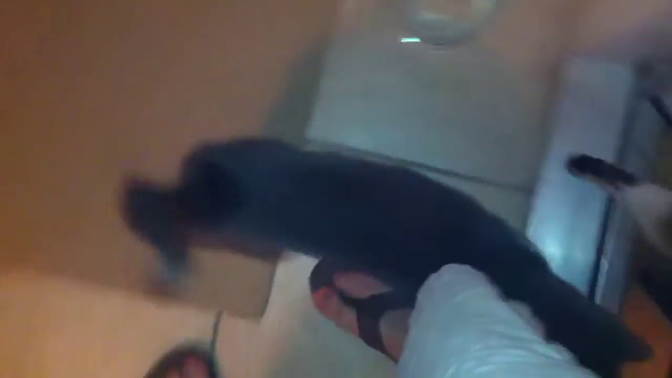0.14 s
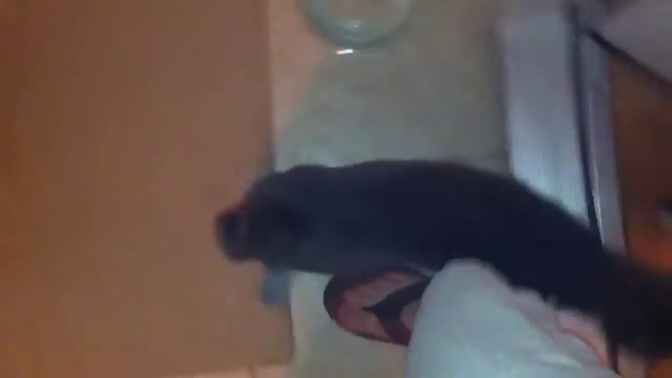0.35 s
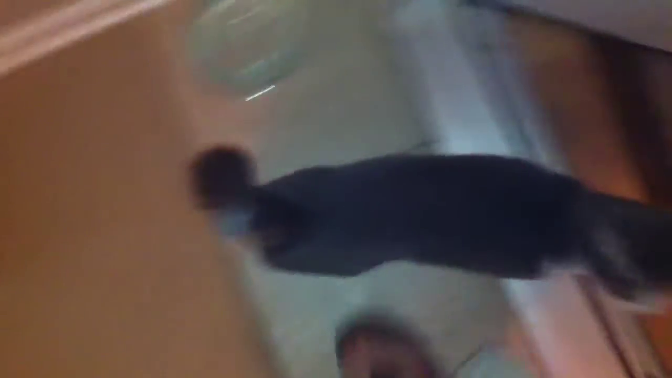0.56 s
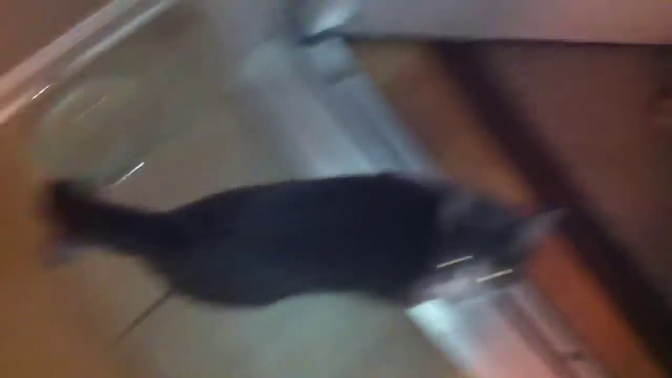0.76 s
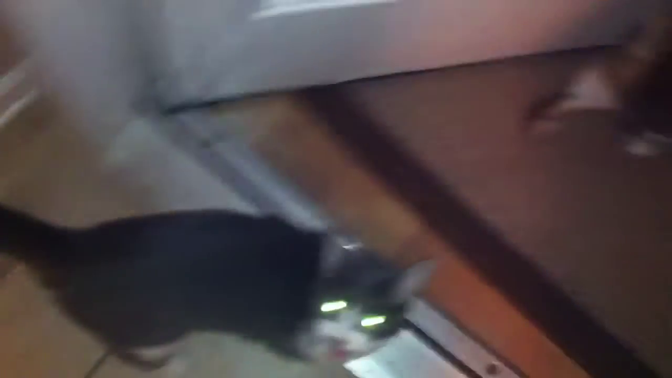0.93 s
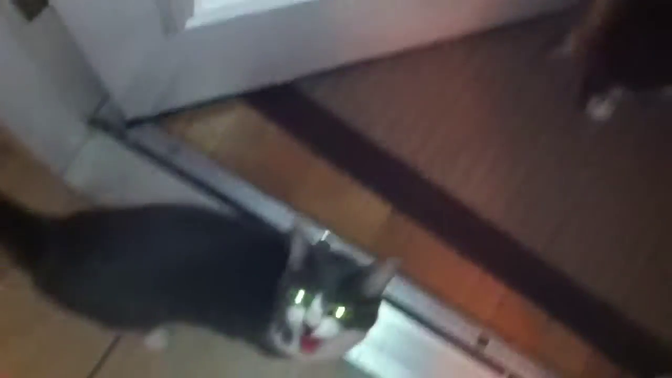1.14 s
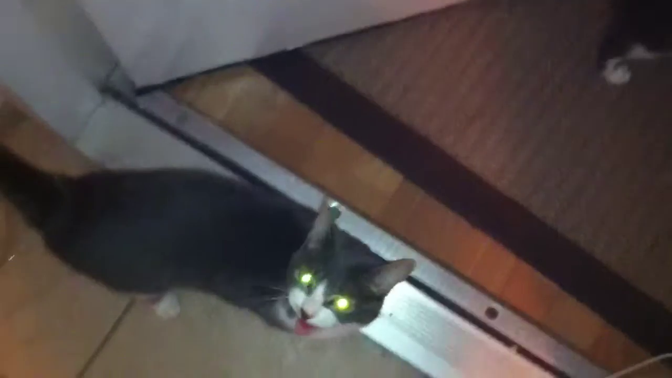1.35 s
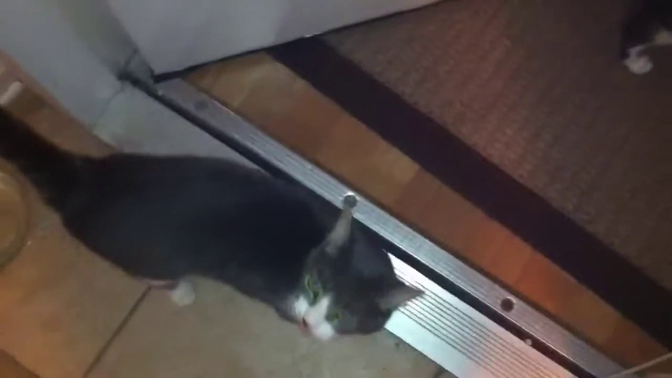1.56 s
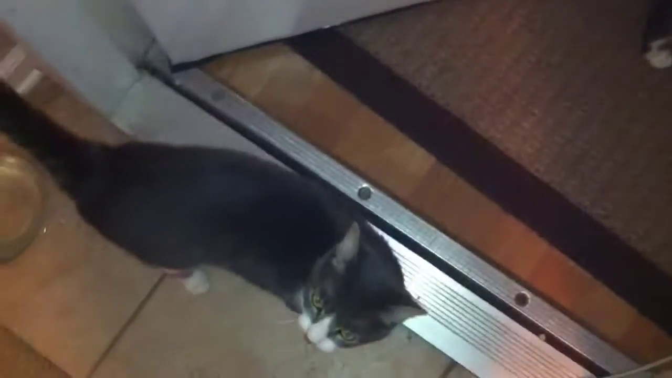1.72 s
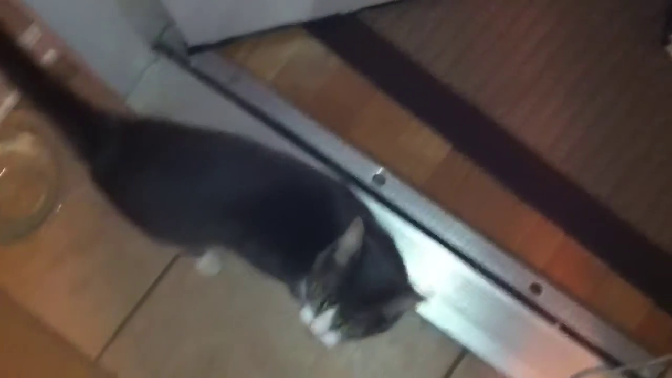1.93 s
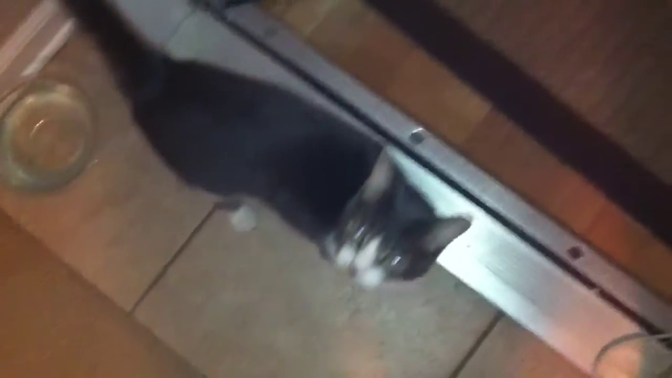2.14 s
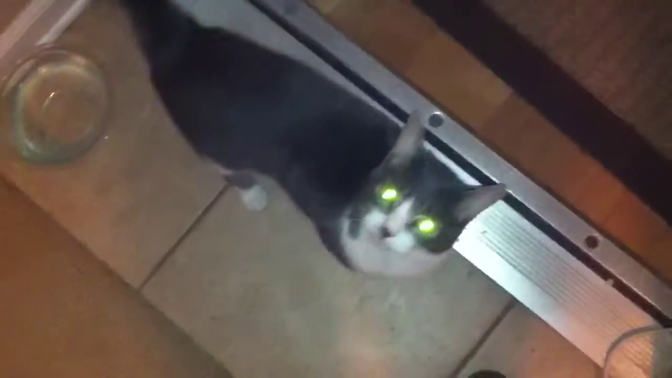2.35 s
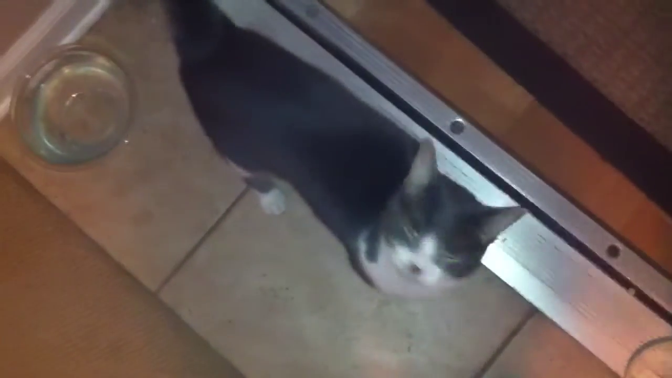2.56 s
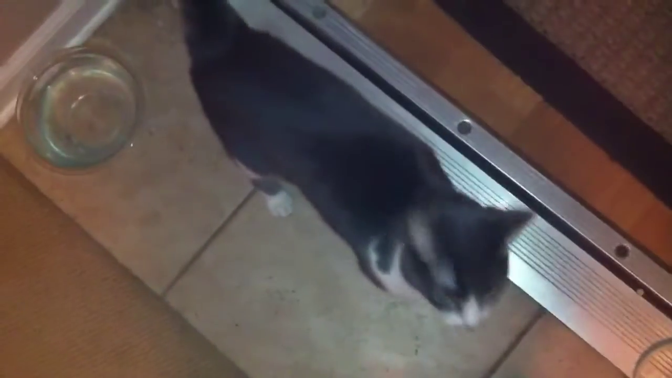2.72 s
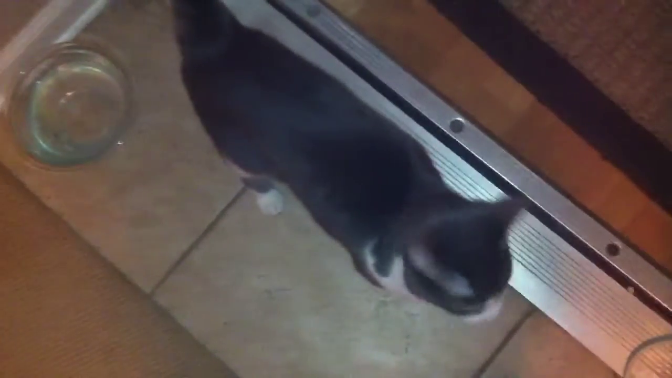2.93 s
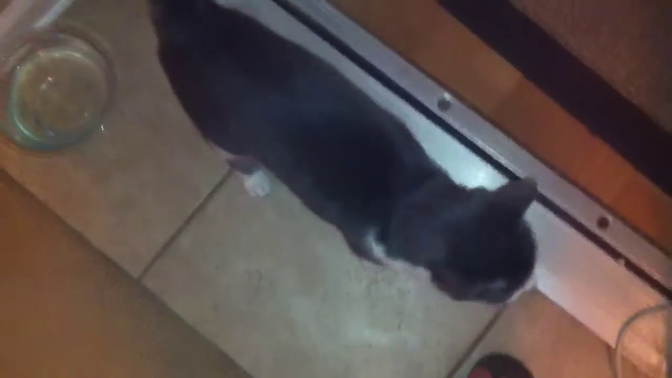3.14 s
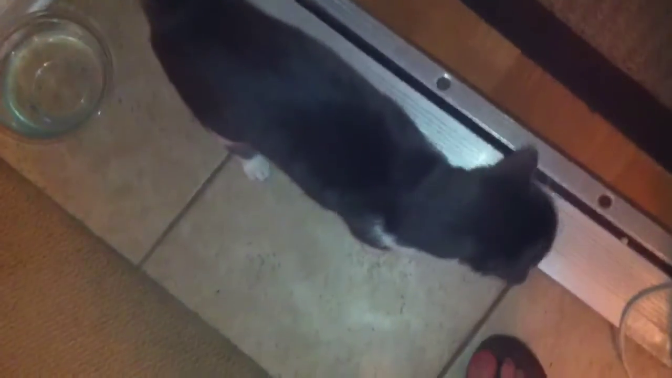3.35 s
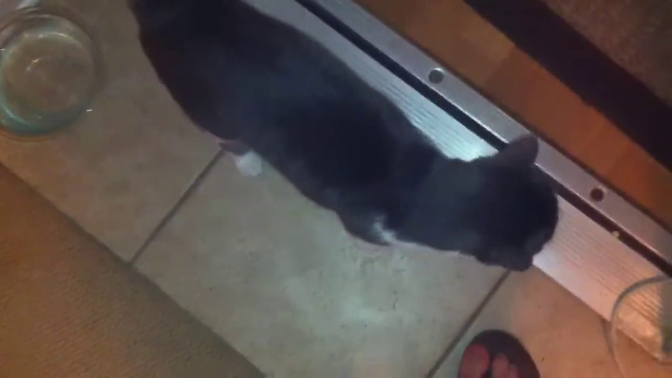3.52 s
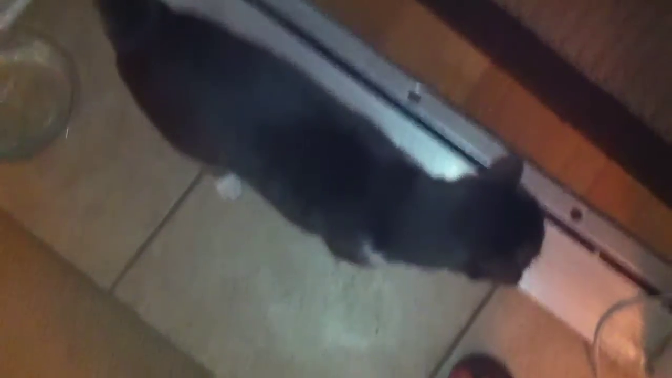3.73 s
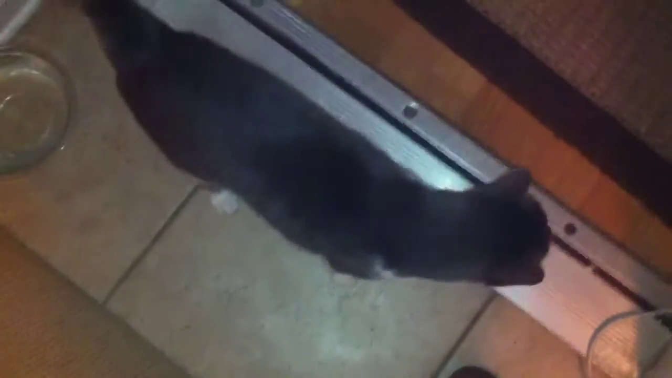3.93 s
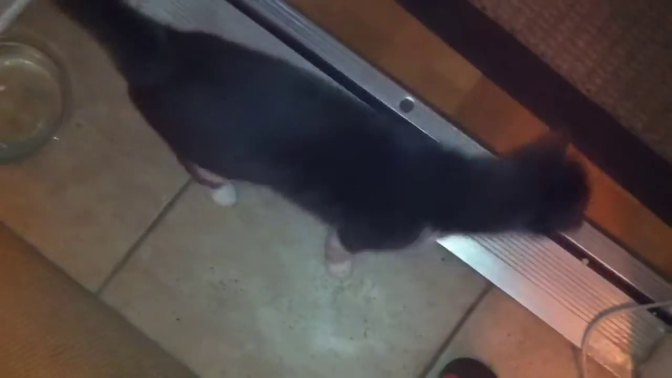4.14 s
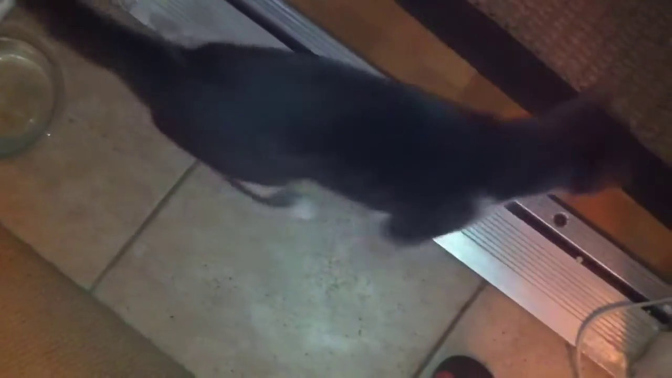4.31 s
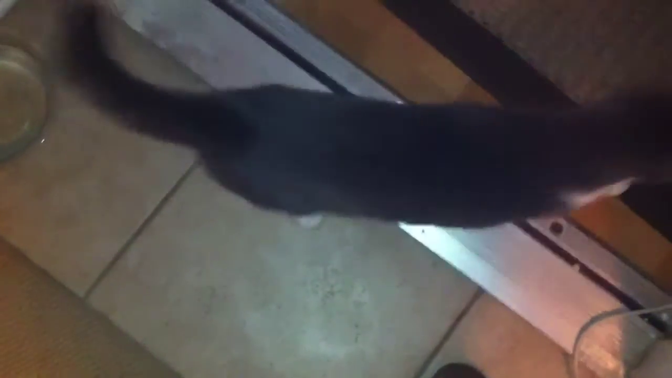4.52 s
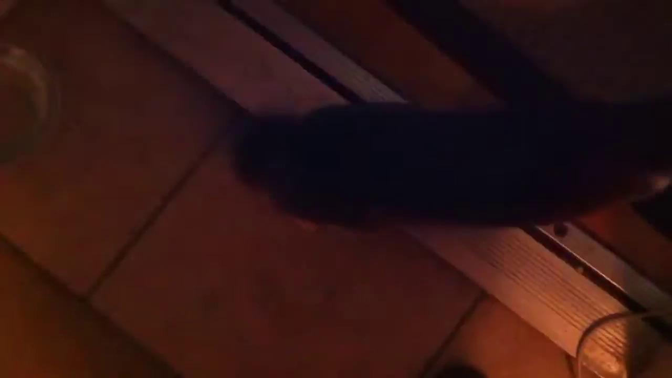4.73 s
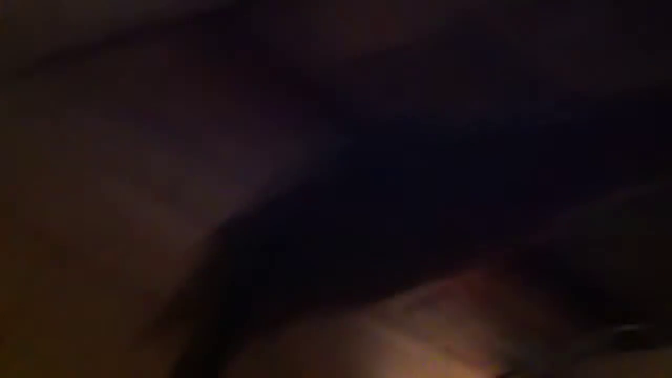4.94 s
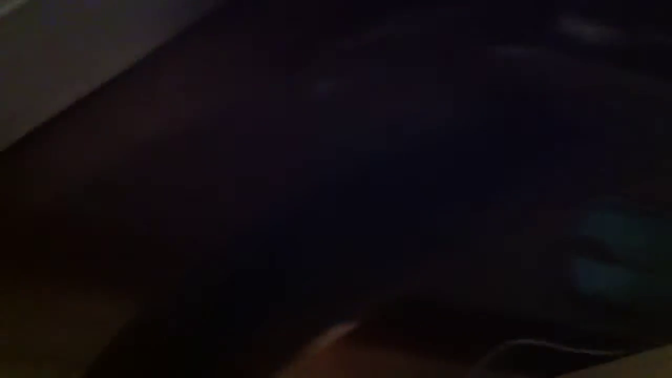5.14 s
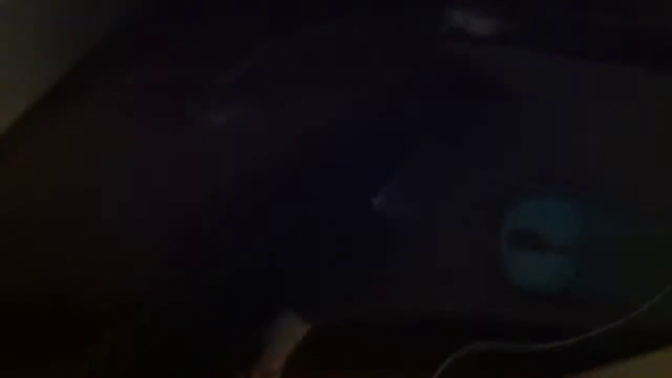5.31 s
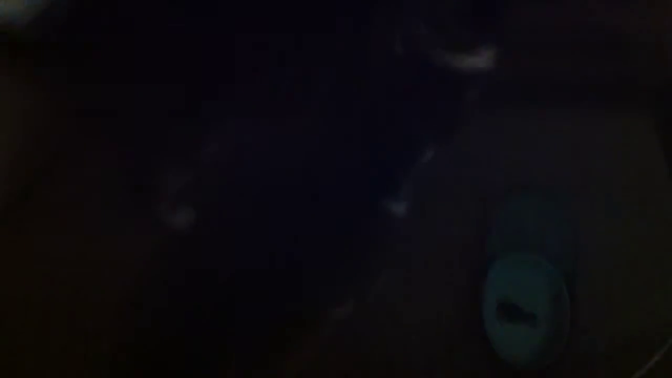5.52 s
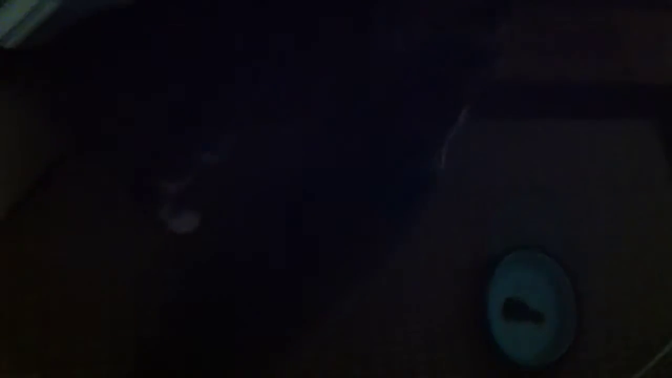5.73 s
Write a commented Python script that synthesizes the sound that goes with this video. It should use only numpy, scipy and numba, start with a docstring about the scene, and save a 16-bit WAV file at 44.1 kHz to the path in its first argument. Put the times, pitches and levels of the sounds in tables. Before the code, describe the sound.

Over a low indoor rumble, a cat meows loudly, then more softly; a tap, a crisp click and a short rustle follow along.

```python
"""Cat meowing in a small tiled room

A cat on a tiled floor by a doorway meows twice, by source and filter: vocal fold pulses ring moving resonances.
Each meow starts raspy, clears, and sinks in pitch as the mouth closes; floor, door and walls echo it briefly.
Swells of filtered noise give faint scuffs of feet and an echo dying away after the first meow; decaying modes
give small taps and, near the end, a sharp click close by. A short rustle of grainy noise follows it, over a
low indoor rumble of shaped noise."""
import sys
import numpy as np
from scipy import signal
from scipy.fft import rfft, irfft
from scipy.io import wavfile
from scipy.ndimage import uniform_filter1d, map_coordinates
from numba import njit

SR = 44100
rng = np.random.default_rng(int(sys.argv[2]) if len(sys.argv) > 2 else 0)


def digitize_waveform(pressure):
    """Quantize a signal to 16-bit integers and store it at the path in sys.argv[1].

    Rows of a 2-D input are taken as channels; values are limited to [-1, 1].
    """
    field = np.atleast_2d(pressure).T
    bounded = np.clip(field, -1, 1)
    quanta = np.round(bounded * 32767).astype(np.int16)
    wavfile.write(sys.argv[1], SR, quanta)


N = 258853
TIME = np.arange(N) / SR


def undb(db):
    """Logarithmic level: decibels to amplitude gain."""
    return 10 ** (np.asarray(db) / 20)


def unit(x):
    """Power normalization: scale to rms 1."""
    return x / np.sqrt(np.mean(x ** 2))


def steady(x, size=1300):
    """Envelope normalization: hold the running rms, smoothed twice over size samples, at 1."""
    power = uniform_filter1d(uniform_filter1d(x ** 2, size), size)
    return x / np.sqrt(np.abs(power) + 1e-12)


def curves(rows, t):
    """Linear interpolation: the columns of a table, after its time column, at times t."""
    s, *columns = np.transpose(rows)
    return [np.interp(t, s, c) for c in columns]


def coloured(x, points):
    """Spectral shaping: weight x by (Hz, dB) points joined over log frequency, at rms 1."""
    hz, db = np.transpose(points)
    f = np.maximum(np.fft.rfftfreq(len(x), 1 / SR), 1)
    gain = undb(np.interp(np.log(f), np.log(hz), db))
    return unit(irfft(rfft(x) * gain, len(x)))


def cut(x, hz, kind, order=2):
    """Maximally flat filtering: Butterworth low-pass or high-pass."""
    return signal.sosfilt(signal.butter(order, min(hz, .45 * SR), kind, fs=SR, output="sos"), x)


@njit
def svf(x, hz, width):
    """Two coupled integrators: a state-variable band-pass with a moving centre."""
    y = np.empty(len(x))
    band, low = 0., 0.
    for i in range(len(x)):
        g = np.tan(np.pi * hz[i] / SR)
        damping = width / hz[i]
        v = (band + g * (x[i] - low)) / (1 + g * (g + damping))
        band = 2 * v - band
        low += 2 * g * v
        y[i] = damping * v
    return y


def resonance(x, hz, width):
    """Damped oscillator: one resonance, fixed or moving, gain 1 at its centre."""
    return svf(x, hz * np.ones(len(x)), float(width))


def wobble(t, rate):
    """Band-limited chance: random knots, rate a second, joined by a smooth spline."""
    knots = rng.standard_normal(8192)
    return map_coordinates(knots, [(t - t[0]) * rate], order=3, mode="wrap")


def strike(events, modes):
    """Modal superposition: each (s, dB) event rings decaying sines whose sum is scaled to peak 1."""
    t = TIME[:SR // 4]
    ring = sum(undb(db - 60 * t / t60) * np.sin(2 * np.pi * hz * t) for hz, db, t60 in modes)
    blows = np.zeros(N)
    for s, db in events:
        blows[int(s * SR)] = undb(db)
    return signal.fftconvolve(blows, ring / np.abs(ring).max())[:N]


# Spectrum of the indoor rumble and hiss, relative: frequency_hz, level_db
RUMBLE_SPECTRUM = [(18, -23), (30, -32), (85, -26.5), (102, -15.5), (130, -14), (182, -2.5), (263, -8.5),
                   (369, -8), (443, -11.5), (479, -12), (921, -21), (996, -22.5), (1110, -21),
                   (2830, -26.5), (15500, -31)]


def background(rumble_db=-65, drone_hz=188, drone_width=35, drone_db=-73):
    """Stationary noise: steady indoor rumble and hiss, with a soft low drone of narrow-band noise."""
    wash = coloured(rng.standard_normal(N), RUMBLE_SPECTRUM)
    drone = resonance(resonance(rng.standard_normal(N), drone_hz, drone_width), drone_hz, drone_width)
    return undb(rumble_db) * wash + undb(drone_db) * unit(drone)


# First echoes from floor and door, against the direct sound: delay_s, level_db
FIRST_ECHOES = [(.0013, -28), (.0046, -10), (0.0104, -15.5)]


def room(x, wet_db, t60, first_s=0.00463):
    """Reverberation: floor and door return a few echoes, the walls a dense, exponentially decaying tail."""
    t = TIME[:SR // 2]
    # furnishings soak up the treble
    tail = cut(rng.standard_normal(len(t)), 5550, "low")
    response = tail * undb(-60 * t / t60) * (t > first_s)
    response *= undb(wet_db) / np.sqrt(np.sum(response ** 2))
    response[0] = 1  # direct sound
    for delay, db in FIRST_ECHOES:
        response[int(delay * SR)] += undb(db)
    # unit energy over direct sound, echoes and tail
    return signal.fftconvolve(x, response / np.sqrt(np.sum(response ** 2)))[:N]


# Soft noise swells, before the room: peak_s, rise_s, fall_s, level_db, centre_hz, width_hz
# Scuffs of feet, except the one at 1.979 s: the first meow's echo dying away in the room
NOISE_SWELLS = [(0.288, 0.0091, 0.045, -66, 2060, 2460), (.40, 0.068, 0.3, -70.5, 1880, 3000),
                (0.599, 0.028, 0.016, -58.5, 2620, 3160), (0.969, 0.035, 0.53, -66.5, 2660, 4370),
                (1.979, 0.014, 0.035, -66.5, 1886, 1188), (2.369, 0.016, 0.07, -66.5, 1580, 1760),
                (2.408, 0.0051, 0.014, -68, 2640, 3500), (2.70, 0.023, 0.018, -74, 4000, 3500),
                (3.62, 0.04, 0.029, -68.5, 8600, 1799), (4.769, 0.012, 0.0077, -67.5, 4900, 2500)]


def noise_swells(grain_db=3.0):
    """Band-filtered noise: short grainy swells for faint scuffs and for the first meow's dying echo."""
    noise = rng.standard_normal(N) * undb(grain_db * wobble(TIME, 400))
    out = np.zeros(N)
    for s, rise, fall, db, hz, width in NOISE_SWELLS:
        swell = np.exp(-((TIME - s) / np.where(TIME < s, rise, fall)) ** 2)
        out += undb(db) * swell * unit(resonance(noise, hz, width))
    return out


# Small taps, before the room: start_s, peak_db
TAP_EVENTS = [(2.465, -39.5), (4.57, -57)]
# Modes that a tap rings with, relative: frequency_hz, level_db, t60_s
TAP_RING = [(996, -1, 0.071), (1793, 4, 0.053), (2286, 8, 0.027), (2140, -29, 0.15), (2890, -2, 0.041),
            (3210, 0, .025), (3620, -5, 0.028), (4180, -5, 0.028)]


def taps():
    """Impact excitation: a tap sets damped modes ringing."""
    return strike(TAP_EVENTS, TAP_RING)


# Close clicks, before the high-pass: start_s, peak_db
CLICK_EVENTS = [(4.0794, -48), (4.8937, -35), (4.92, -19)]
# Modes that a click rings with, relative: frequency_hz, level_db, t60_s
CLICK_RING = [(194, -14, 0.027), (1040, -15.5, 0.021), (1950, -17, 0.012), (5670, 3.5, 0.0022),
              (8960, 12.5, 0.0016), (11800, -7, 0.0011)]


def clicks():
    """Impact excitation: mostly very short modes make a sharp click, with the lowest bass cut."""
    return cut(strike(CLICK_EVENTS, CLICK_RING), 114, "high")


# Spectrum of the close rustle, relative: frequency_hz, level_db
RUSTLE_SPECTRUM = [(290, -41), (550, -8), (1000, 0), (2400, -15), (4300, -4.5), (5200, -2.5), (6300, -6),
                   (7200, -8), (9500, -7.5), (15000, -20)]
RUSTLE_START_S, RUSTLE_PEAK_S, RUSTLE_RELEASE_S = 4.91, 5.023, 0.018
RUSTLE_DB, RUSTLE_SWELL_DB_PER_S = -53.5, 125


def rustle(grain_db=2):
    """Friction noise: something slides close to the microphone, swells and stops short."""
    swell = undb(RUSTLE_DB - RUSTLE_SWELL_DB_PER_S * np.maximum(RUSTLE_PEAK_S - TIME, 0))
    release = np.clip(1 - (TIME - RUSTLE_PEAK_S) / RUSTLE_RELEASE_S, 0, 1) ** 2
    friction = rng.standard_normal(N) * undb(grain_db * wobble(TIME, 900))
    return coloured(friction, RUSTLE_SPECTRUM) * swell * release * (TIME > RUSTLE_START_S)


RASP_START, RASP_BUILD_S = 0.74, 0.12  # share of the rasp present at once; time it takes to build up
CLEAR_ROUGH, CLEARING_S = 0.064, 0.057  # roughness once the voice has cleared; time it takes to clear
TIRING_ROUGH_PER_S = 0.28  # the voice slowly grows hoarser again
BREAKUP_ROUGH, BREAKUP_S = 0.49, 0.051  # and breaks up at the very end


def roughness(t, rasp_s, rasp):
    """Irregular phonation: the rasp builds, the voice clears, grows slowly hoarser and breaks up as it dies."""
    age = t - t[0]
    opening = rasp * np.interp(age, [0, RASP_BUILD_S], [RASP_START, 1])
    cleared = np.clip((age - rasp_s) / CLEARING_S + .5, 0, 1)
    clear = CLEAR_ROUGH + TIRING_ROUGH_PER_S * np.maximum(age - rasp_s, 0)
    breakup = BREAKUP_ROUGH * np.exp((t - t[-1]) / BREAKUP_S)
    return np.clip(opening + cleared * (clear - opening) + breakup, 0, 1)


def folds(t, hz, rough, jitter=.05, waver=0.0021, shimmer=0.22, doubling=0.31, rasp=0.94):
    """Glottal source: a pulse of 28 harmonics; roughness makes it uneven, alternately strong and weak, airy."""
    rate = hz * (1 + jitter * rough * wobble(t, 260) + waver * wobble(t, 40.37))
    phase = 2 * np.pi * np.cumsum(rate) / SR
    pulses = unit(sum(np.cos(k * phase) for k in range(1, 29)))
    # half the phase: every other pulse is stronger
    size = 1 + rough * (shimmer * wobble(t, 300) + doubling * np.cos(phase / 2))
    air = unit(rng.standard_normal(len(t)) * (1 + np.cos(phase)))
    return pulses * size + rasp * rough * air, phase


EDGE_DROP = 0.044  # share by which the throat resonance lies lower at both ends of a call
THIRD_START_HZ, THIRD_RISE_S = 3000, .095  # the third resonance rises from here as the call opens, then stays
FOURTH_START_HZ, FOURTH_END_HZ = 4690, 6370  # the fourth resonance climbs through the call


def tract(t, throat_hz, third_hz):
    """Vocal tract modes in Hz: the throat resonance arches over the call, the third and fourth climb."""
    progress = np.linspace(0, 1, len(t))
    arch = 1 - EDGE_DROP * (1 - np.sin(np.pi * progress))
    rising_hz = third_hz + (THIRD_START_HZ - third_hz) * np.exp((t[0] - t) / THIRD_RISE_S)
    climbing_hz = FOURTH_START_HZ + (FOURTH_END_HZ - FOURTH_START_HZ) * progress
    return throat_hz * arch, rising_hz, climbing_hz


OPEN_HZ = 2890  # mouth resonance with the mouth wide open
FADE_DB = -23.5  # change of effort at the very start and end of a call
THROAT_DB, THROAT_FADE = -53, 0.62  # the throat is equally strong in every call; its share of the fades
# third and fourth resonances: level against the effort when wide open; loss as the mouth closes
THIRD_DB, THIRD_DB_PER_OCT = -1.5, 20
FOURTH_DB, FOURTH_DB_PER_OCT = -8, 16.5


def strengths(t, attack_s, release_s, effort_db, mouth_hz):
    """Mouth radiation: levels in dB attack, hold and release; a closing mouth muffles third and fourth."""
    attack = np.maximum(1 - (t - t[0]) / attack_s, 0) ** 2
    release = np.maximum(1 - (t[-1] - t) / release_s, 0) ** 2
    fade_db = FADE_DB * (attack + release)
    closing = np.maximum(np.log2(OPEN_HZ / mouth_hz), 0)  # octaves below wide open
    return (THROAT_DB + THROAT_FADE * fade_db,
            effort_db + fade_db + THIRD_DB - THIRD_DB_PER_OCT * closing,
            effort_db + fade_db + FOURTH_DB - FOURTH_DB_PER_OCT * closing)


RASP_LOSS_DB = -2.5  # the mouth resonance weakens at full roughness
OPEN_WIDENING, OPEN_LOSS_DB = .35, -2  # a wide open mouth radiates freely: resonance broader and weaker
# Turbulent air in the open mouth, relative: frequency_hz, level_db
AIR_SPECTRUM = [(700, -52), (1600, -3.5), (2400, 5), (3100, 3.5), (3900, -7), (4900, -4), (5400, -16.5),
                (6200, -15), (7000, -47), (11000, -35), (15000, -65)]
# The meows: start_s, end_s, attack_s, release_s, effort_db, raspy opening rasp_s, its roughness rasp (0-1),
# throat_hz, third_hz, fundamental_db at 390 Hz, nasal_db against the throat
MEOW_CALLS = [(1.055, 1.919, .105, 0.18, -41, 0.255, 0.54, 895, 3750, -62.5, -9),
              (3.14, 3.88, .075, 0.19, -48, 0.121, 0.61, 870, 3980, -67, -4.5)]
# Pitch of each meow: time_s, pitch_hz
MEOW_PITCH = [
    [(1.08, 337), (1.15, 421.5), (1.18, 393.2), (1.296, 385.4), (1.46, 381.8), (1.64, 339.4), (1.69, 316.3),
     (1.828, 295.2), (1.87, 250)],
    [(3.18, 387.7), (3.242, 356.6), (3.26, 296.2), (3.33, 289.5), (3.426, 300.8), (3.578, 300.9),
     (3.71, 286), (3.82, 260.5)],
]
# Mouth resonance level before losses, swelling where a harmonic crosses it: time_s, level_db
MOUTH_SWELL = [
    [(1.05, -68.5), (1.132, -38.5), (1.25, -38), (1.268, -42), (1.406, -35.5), (1.436, -35), (1.476, -41.5),
     (1.788, -45), (1.92, -80)],
    [(3.14, -71), (3.186, -49), (3.228, -45.5), (3.654, -45), (3.68, -35.5), (3.718, -55), (3.748, -42.5),
     (3.842, -59), (3.88, -76)],
]
# The mouth opens fast and closes slowly: time_s, mouth_hz
MOUTH_OPENING = [
    [(1.06, 1550), (1.15, 2960), (1.3, 2930), (1.345, 2364), (1.43, 2360), (1.55, 2030), (1.68, 1746),
     (1.87, 1540)],
    [(3.14, 1580), (3.19, 2250), (3.24, 2740), (3.43, 2784), (3.55, 2620), (3.61, 2217), (3.67, 2026),
     (3.76, 1851), (3.88, 1690)],
]


def meow(call, pitch, level, opening, throat_width=150, nasal_hz=1500, nasal_width=120, mouth_width=170,
         rough_widening=4, third_width=1100, fourth_width=1400, air_db=-1, mouth_gain_db=-.2):
    """Source-filter principle: fold pulses ring four moving resonances; hoarse air hisses between them."""
    (start, end, attack_s, release_s, effort_db, rasp_s, rasp,
     mid_throat_hz, held_third_hz, fundamental_db, nasal_db) = call
    span = (TIME >= start) & (TIME <= end)
    t = TIME[span]
    hz, = curves(pitch, t)
    mouth_hz, = curves(opening, t)
    level_db, = curves(level, t)
    rough = roughness(t, rasp_s, rasp)
    gape = np.minimum(mouth_hz / OPEN_HZ, 1) ** 8  # near 1 only when wide open
    mouth_db = level_db + mouth_gain_db + RASP_LOSS_DB * rough + OPEN_LOSS_DB * gape
    throat_hz, third_hz, fourth_hz = tract(t, mid_throat_hz, held_third_hz)
    throat_db, third_db, fourth_db = strengths(t, attack_s, release_s, effort_db, mouth_hz)
    source, phase = folds(t, hz, rough)

    nasal = undb(nasal_db) * resonance(source, nasal_hz, nasal_width)
    throat = resonance(source, throat_hz, throat_width) - nasal
    throat = cut(cut(throat, 540, "high", order=4), 2700, "low", order=3)
    # leaky, rough folds damp the mouth resonance and broaden it
    widening = rough_widening * rough ** 2 + OPEN_WIDENING * gape
    mouth = resonance(source, mouth_hz, mouth_width) + widening * resonance(source, mouth_hz, 850)
    mouth = cut(resonance(mouth, mouth_hz, 660), 1080, "high", order=4)
    third = resonance(resonance(source, third_hz, third_width), third_hz, 3800)
    third = cut(third, 4770, "low", order=8)
    fourth = resonance(resonance(source, fourth_hz, fourth_width), fourth_hz, 930)
    fourth = cut(fourth, 6140, "low", order=14)
    # air escapes in one puff per cycle
    air = coloured(rng.standard_normal(len(t)) * (1 + np.cos(phase)), AIR_SPECTRUM)
    fundamental = (hz / 390) ** 3 * np.sin(phase) * signal.windows.tukey(len(t), .2)

    voice = undb(throat_db) * steady(throat) + undb(mouth_db) * steady(mouth)
    voice += undb(fourth_db) * steady(fourth) - undb(third_db) * steady(third)
    voice += undb(air_db + 0.7 * third_db + 0.29 * mouth_db) * rough ** 0.35 * air
    voice += undb(fundamental_db) * fundamental
    out = np.zeros(N)
    out[span] = voice * signal.windows.tukey(len(t), .03)
    return out


def scene():
    """Superposition: meows, noise swells and taps sound in the room; clicks and rustle are close and dry."""
    cat = sum(meow(*controls) for controls in zip(MEOW_CALLS, MEOW_PITCH, MOUTH_SWELL, MOUTH_OPENING))
    faint = noise_swells() + taps()
    close = clicks() + rustle()
    reverberant = room(cat, wet_db=-9, t60=0.44) + room(faint, wet_db=-10.5, t60=0.45)
    return (reverberant + close + background())[None]


TOP_HZ = 15800


def record(dry):
    """Band limiting: a steep elliptic low-pass removes the top of the treble."""
    return signal.sosfilt(signal.ellip(10, .2, 70, TOP_HZ, fs=SR, output="sos"), dry)


dry = scene()
out = record(dry)
digitize_waveform(out)
```